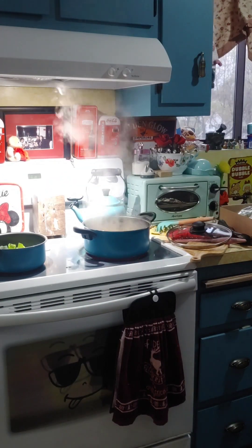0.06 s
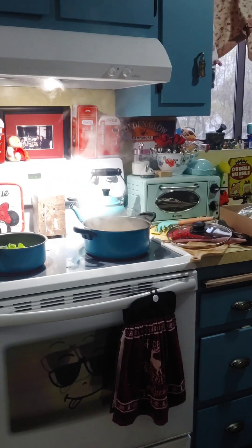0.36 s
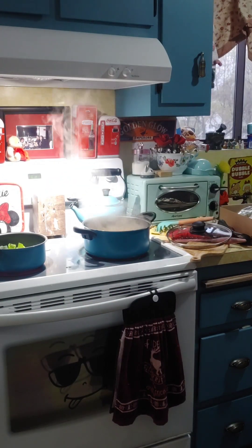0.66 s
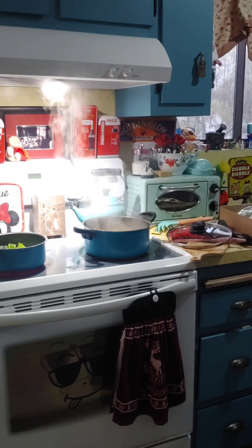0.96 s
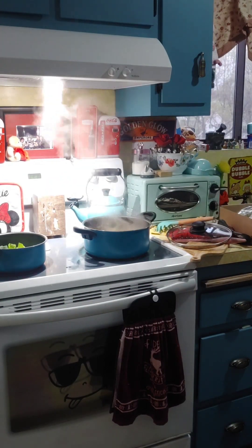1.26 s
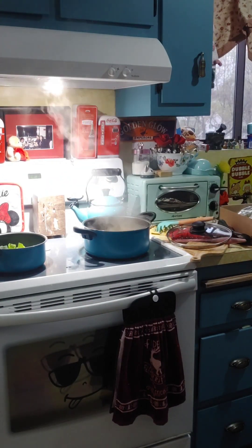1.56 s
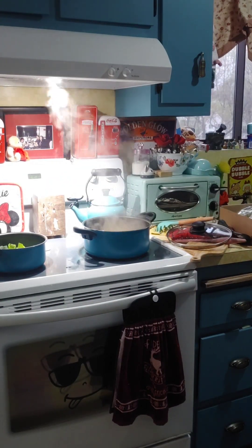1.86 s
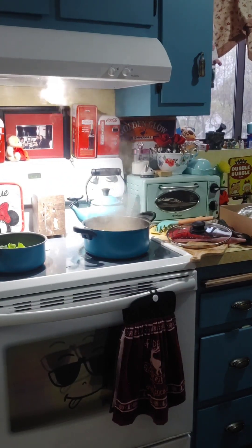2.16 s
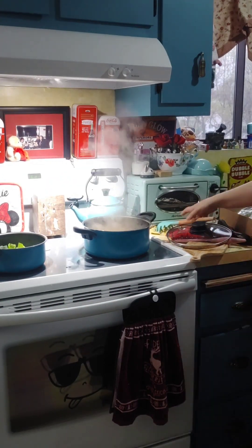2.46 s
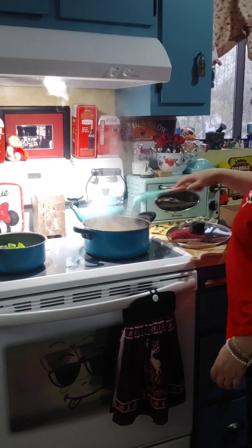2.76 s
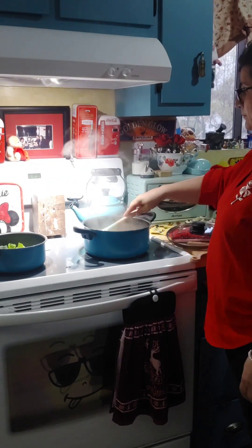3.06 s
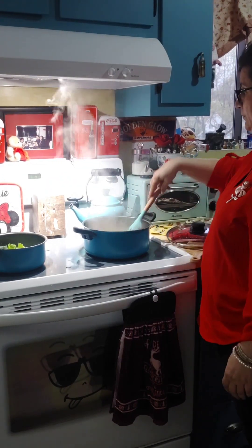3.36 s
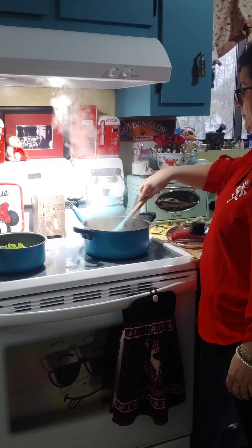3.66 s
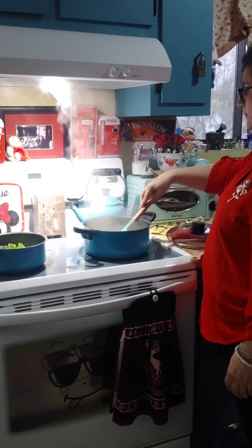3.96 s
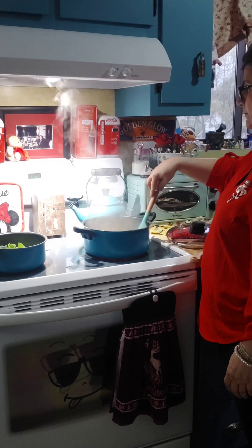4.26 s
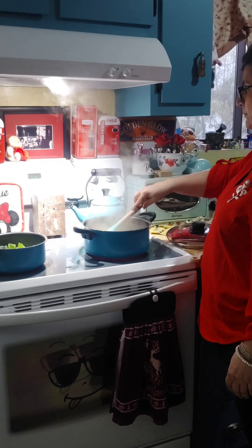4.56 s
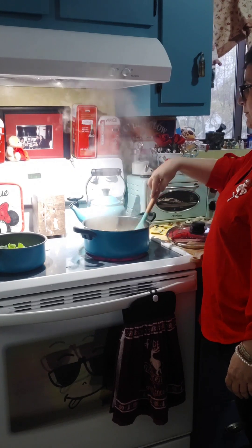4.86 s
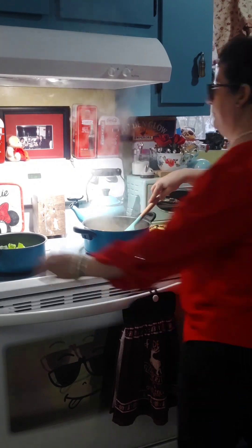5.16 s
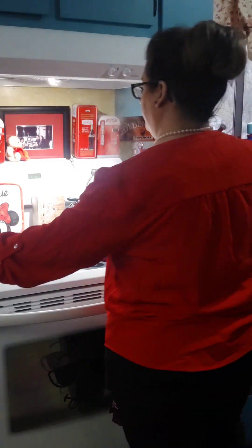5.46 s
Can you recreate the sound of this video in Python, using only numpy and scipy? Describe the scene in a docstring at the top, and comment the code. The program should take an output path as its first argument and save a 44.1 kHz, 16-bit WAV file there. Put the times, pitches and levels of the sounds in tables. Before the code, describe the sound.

A stove fan hums steadily over rushing air in a small home kitchen, with a pot simmering very faintly. Nearby, a drawer clacks, slides open and bumps its stop. After light rummaging and a nudge, it bangs shut, the loudest sound, and a pan rocks briefly to rest. Then come a soft sleeve rustle, a faint spoon clink on the pot and a few light utensil taps.

```python
"""A kitchen drawer clacks, slides open, is rummaged in and bangs shut; a pan rocks to rest after the bang.
Then a spoon taps a pot and a sleeve rustles past; utensils tap and scrape lightly here and there.
Each blow is scattered reflections, ringing modes and a panel thump; each rub is grainy friction hiss.
Behind it all a stove fan hums over rushing air, and bubbles burst in the simmering pot."""
import sys
import numpy as np
from scipy import signal
from scipy.fft import rfft, irfft
from scipy.io import wavfile
from scipy.ndimage import uniform_filter1d

SR = 44100
rng = np.random.default_rng(int(sys.argv[2]) if len(sys.argv) > 2 else 0)


def transcribe(u):
    """Save the signal u as a 16-bit wav file named by the first command-line argument.

    u: samples, shape (n,) or (channels, n), limited to [-1, 1]; the rate is SR.
    q: integer samples, one column per channel.
    """
    v = np.clip(np.atleast_2d(u).T, -1, 1)
    q = np.round(v * 32767).astype(np.int16)
    wavfile.write(sys.argv[1], SR, q)


N = 247842

# Left-right likeness of the kitchen's sound. Each row: frequency in Hz, coherence from 0 to 1.
COHERENCE = [(100, 0.97), (300, 0.72), (550, 0.57), (1000, 0), (2500, 0.09), (8000, 0)]
# Drawer struck by the slam or the pan. Each row: frequency in Hz, relative density in dB.
SLAM_SPECTRUM = [(25, -36), (55, -14), (82, -4.5), (125, -9), (200, -12), (300, 0), (520, -5),
                 (1000, -12.5), (1500, -19), (2800, -22.5), (3200, -27), (7100, -37.5), (8200, -51),
                 (15000, -66)]
# Its modes. Each row: frequency in Hz, relative level in dB, t60 in seconds before the cap in blows().
SLAM_RING = [(86, -9.5, 0.39), (198.5, 3.5, 0.16), (310, -2, .24), (471.5, -12, 0.23), (531, -13, 0.24),
             (679, -2.5, 0.15), (797, -10.5, 0.27), (940, -3.5, 0.12), (1164, -11, 0.23), (1345, -28, 0.25),
             (1734, -10, 0.17), (2020, -17, 0.06), (2645, -9, 0.088), (2814, -8.5, 0.053),
             (3736, -16, 0.064), (4300, -26, .11)]


def drawer():
    """The drawer clacks free, slides on its rails, bumps its stop, is rummaged in, nudged and slammed."""
    # Each row: start in seconds, level in dB, rise in seconds, treble in dB, thump in Hz, thump in dB.
    clacks = [(.205, -19.5, .014, -2.5, 222, -30.5)]
    bumps = [(.468, -33, 0.013, 12, 89, -47), (.480, -23, 0.0049, -3, 342, -28),
             (.507, -29, .0055, -18, 309, -27.5)]
    nudges = [(1.562, -38.5, .008, -10.5, 297, -40.5), (1.578, -50, 0.016, 8.5, 89, -44.5),
              (1.605, -34.5, 0.0061, 0, 296, -48)]
    slams = [(1.923, -23.5, 0.0051, 4, 82, -23), (1.931, -12, 0.0076, 3.5, 190.2, -18.5),
             (1.963, -18, 0.0021, -8, 285, -28), (2.045, -18, 0.0082, -1, 158.3, -23.5),
             (2.072, -23, .01, -22, 84, -41)]
    # Spectra of blows and rubs. Each row: frequency in Hz, relative density in dB.
    clack_spectrum = [(60, -35), (120, -13.5), (230, -3.5), (500, -3), (700, -6.5), (1100, -10), (1750, -6),
                      (2600, -6.5), (2900, -19), (3700, -7.5), (4800, -17), (7000, -18), (8200, -24.5),
                      (15000, -24)]
    bump_spectrum = [(40, -33), (140, -10.5), (190, -13), (300, -13), (380, -4.5), (450, -6.5), (530, 2),
                     (700, -10), (1300, -11.5), (2600, -16), (3300, -20.5), (5300, -26), (7500, -37.5),
                     (15000, -49)]
    nudge_spectrum = [(50, -23), (90, -17), (190, -8.5), (300, 1.5), (500, -9), (780, -7), (1150, -7.5),
                      (1400, -11.5), (2000, -11), (3200, -19), (5000, -21), (7000, -21.5), (8000, -34.5),
                      (15000, -43)]
    slide_spectrum = [(180, -21), (300, -5), (342, -13), (424, 2), (500, -14), (696, -8), (1140, -12.5),
                      (1750, -9.5), (3340, -13.5), (6790, -15), (15500, -34)]
    rummage_spectrum = [(400, -0.5), (1100, 1), (1500, -1), (2200, 3), (3000, -14), (6500, -16),
                        (9000, -29), (15000, -27)]
    # Modes. Each row: frequency in Hz, relative level in dB, uncapped t60 in seconds.
    clack_modes = [(422, 2, 0.086), (820, -10, 0.11), (1034, -2, 0.1), (1255, 1, 0.15), (1570, -4, 0.22),
                   (1752, 7, 0.1), (1920, -5, .14), (2300, -21, 0.069), (2580, 2, 0.13), (3690, -10, 0.14),
                   (4026, -13, 0.18), (4170, -21, 0.11), (4920, -25, 0.18), (6920, -14.5, 0.16)]
    bump_modes = [(310.5, -7.5, 0.16), (358, -9.5, .14), (536, -1, 0.11), (824, -11, 0.2),
                  (1400, -25, 0.23), (1910, -12.5, 0.54), (2340, -24, 0.18), (2380, -10.5, 0.097),
                  (2660, -5, 0.1), (4050, -10, 0.074), (5238, -12.5, 0.081)]
    nudge_modes = [(280, -4, 0.067), (623, 1.5, 0.12), (780, 1, 0.23), (1160, 1.5, 0.096),
                   (1480, -19, 0.21), (1970, -29, .14)]
    out = blows(clacks, clack_spectrum, clack_modes, hang=0.9, thump_t60_s=0.1, ring_db=-2.5, left_db=0.5)
    out += blows(bumps, bump_spectrum, bump_modes, hang=0.98, thump_t60_s=0.1, ring_db=-2, left_db=0.5)
    out += blows(nudges, nudge_spectrum, nudge_modes, hang=1.12, thump_t60_s=0.16, ring_db=-2, left_db=0)
    out += blows(slams, SLAM_SPECTRUM, SLAM_RING, hang=0.8, thump_t60_s=0.28, ring_db=-6.5, left_db=0.8)
    slide = stroke(start_s=0.3136, hold_s=0.063, db=-38, attack_s=0.015, fade_db_per_s=288)
    rummage = stroke(start_s=0.828, hold_s=0.22, db=-55, attack_s=0.028, fade_db_per_s=89)
    return out + rub(slide, slide_spectrum, grain_db=0.5) + rub(rummage, rummage_spectrum, grain_db=1)


def blows(rows, spectrum, modes, hang, thump_t60_s, ring_db, left_db, size=16384):
    """Each blow: reflections lasting hang times the room's t60, ringing modes and a panel thump."""
    # Kitchen decay. Each row: frequency in Hz, t60 in seconds.
    room_t60_s = [(80, 0.23), (250, 0.19), (700, 0.17), (1800, 0.18), (5000, 0.15), (10000, 0.15)]
    max_t60_s = 0.21  # things lying against each other damp the modes
    out, t = np.zeros((2, N)), np.arange(size) / SR
    for start_s, db, rise_s, treble_db, thump_hz, thump_db in rows:
        swell = 1 - np.exp(-(t / rise_s) ** 2.73)  # reflections pile up after first contact
        # a few strong reflections stand out
        crackle = amp(2.57 * unit_rms(uniform_filter1d(rng.standard_normal(size), size=40)))
        hz, age_s, bands = signal.stft(diffuse(size) * crackle, SR, nperseg=256)
        decay = amp(-60 * age_s / (hang * lookup(room_t60_s, hz)[:, None]))
        scatter = signal.istft(bands * decay, SR, nperseg=256)[1][:, :size]
        scatter = unit_onset(coloured(scatter * swell, lambda f: lookup(spectrum, f)))
        ring = 0
        for mode_hz, mode_db, t60_s in modes:
            spread_rad = np.arccos(lookup(COHERENCE, mode_hz)) * rng.choice([-1, 1])
            phase = 2 * np.pi * (mode_hz * t + rng.random()) + spread_rad * np.array([[0.5], [-0.5]])
            ring += amp(mode_db - 60 * t / min(t60_s, max_t60_s)) * np.sin(phase)
        hit = scatter + amp(ring_db) * unit_onset(ring * swell)
        # each blow has its own brightness, from dull knock to sharp tick
        hit = coloured(hit, lambda f: treble_db * f ** 2 / (f ** 2 + 2200 ** 2))
        thump = swell * amp(-60 * t / thump_t60_s) * np.sin(2 * np.pi * thump_hz * t)
        add(out, start_s, sides(left_db) * (amp(db) * hit + amp(thump_db) * unit_onset(thump[None])))
    return out


def rocking_pan():
    """The slam jolts a pan into ringing; each knock on the drawer floor renews the ring, more weakly."""
    # Knocks. Each row: start in seconds, level in dB, treble in dB, thump in Hz.
    rocks = [(2.127, -30.5, -7.5, 158), (2.185, -31.5, -11.5, 190), (2.279, -39, -14, 160.5),
             (2.324, -37.5, -15, 171.3)]
    # Pan modes. Each row: frequency in Hz, relative level in dB, rms pitch wander in Hz.
    modes = [(301, -2, 4.65), (429.5, -22, 13), (630, -28, 16), (910, -26, 60)]
    jolt_s, jolt_db, settle_db_per_s = 2.05, -22, 66
    rise_s, thump_db = 0.0075, -34.5
    envelope = 0
    for start_s in [jolt_s] + [row[0] for row in rocks]:
        contact_db = jolt_db - settle_db_per_s * (start_s - jolt_s)
        envelope += stroke(start_s, hold_s=0.048, db=contact_db, attack_s=0.023, fade_db_per_s=420)
    chatter = amp(2.2 * drift(60))
    ring = sum(amp(db) * tone(hz, wander_hz) for hz, db, wander_hz in modes)
    rows = [(start_s, db, rise_s, treble_db, hz, thump_db) for start_s, db, treble_db, hz in rocks]
    knocks = blows(rows, SLAM_SPECTRUM, SLAM_RING, hang=0.94, thump_t60_s=0.29, ring_db=-1.5, left_db=1.5)
    return envelope * sides(left_db=1) * chatter * ring + knocks


def utensil_taps():
    """Light contacts ring the utensils' high modes."""
    # Each row: start in seconds, level in dB, treble in dB.
    taps = [(.072, -62.5, 6), (.103, -41, -21), (.993, -63.5, 9), (1.218, -58.5, -15), (2.311, -59.5, 9.5),
            (2.936, -54, -22), (3.521, -44.5, -34), (5.163, -49, -22), (5.371, -57.5, 1),
            (5.461, -67, 11.5)]
    # Each row: frequency in Hz, relative density in dB.
    spectrum = [(300, -18.5), (600, -0.5), (1200, -4), (2100, 1.5), (3000, -8.5), (4300, -6), (5400, -10),
                (7000, -5), (8500, -16), (15000, -17.5)]
    # Each row: frequency in Hz, relative level in dB, t60 in seconds.
    modes = [(2420, 2, 0.13), (2810, 3, 0.11), (3720, -4.5, 0.19), (6000, -1.5, .12), (6250, -1, 0.15),
             (6850, 1, 0.119)]
    rise_s, thump_hz, thump_db = 0.0051, 582, -59.5
    rows = [(start_s, db, rise_s, treble_db, thump_hz, thump_db) for start_s, db, treble_db in taps]
    return blows(rows, spectrum, modes, hang=1.16, thump_t60_s=0.15, ring_db=-4.5, left_db=0.5)


def spoon_on_pot():
    """A spoon strikes the pot once: a short, bright clink."""
    # Each row: start in seconds, level in dB, rise in seconds, treble in dB, thump in Hz, thump in dB.
    clinks = [(3.156, -54, .013, 1, 510, -53.5)]
    # Each row: frequency in Hz, relative density in dB.
    spectrum = [(80, -34), (300, -12), (600, 1), (1200, -7.5), (2100, -4), (3000, -24), (4000, -5),
                (4400, 4), (6500, -3), (8300, -9), (11000, -15), (14000, -11), (16000, -18)]
    # Each row: frequency in Hz, relative level in dB, t60 in seconds.
    modes = [(2030, -3, 0.14), (2140, -0.5, 0.11), (3780, -2, 0.091), (4100, -6, 0.079), (4100, 4, 0.071),
             (4920, 3, 0.076), (5550, -5, 0.089)]
    return blows(clinks, spectrum, modes, hang=1.1, thump_t60_s=0.17, ring_db=1.5, left_db=0.1)


def utensil_scrapes():
    """Dragged utensils: a narrow hiss that sinks and fades as each one slows."""
    # Each row: start in seconds, length in seconds, starting pitch in Hz, starting level in dB.
    scrapes = [(0.891, 0.16, 2244, -52), (0.999, 0.095, 1216, -57), (5.13, .12, 2744, -63)]
    width_hz, sag_octaves_per_s, ramp_s, fade_db_per_s = 480, 1.8, 0.0033, 49
    lowpass = signal.butter(2, width_hz / 2, fs=SR, output="sos")
    out = np.zeros((2, N))
    for start_s, length_s, hz, db in scrapes:
        t = np.arange(0, length_s, 1 / SR)
        noise = rng.standard_normal((2, len(t))) + 1j * rng.standard_normal((2, len(t)))
        cycles = np.cumsum(hz * 2 ** (-sag_octaves_per_s * t)) / SR
        hiss = (signal.sosfilt(lowpass, noise) * np.exp(2j * np.pi * cycles)).real
        ramps = 1 - np.exp(-np.minimum(t, length_s - t) / ramp_s)
        add(out, start_s, ramps * amp(db - fade_db_per_s * t) * unit_rms(hiss))
    return out


def sleeve():
    """Cloth rustles with each sweep of the arm."""
    # Each row: start in seconds, hold in seconds, level in dB.
    sweeps = [(2.366, .045, -57.5), (2.448, 0.067, -55.5), (2.675, .28, -69.5), (5.013, 0.037, -61),
              (5.13, 0.044, -58.5), (5.26, 0.035, -59), (5.367, .15, -66)]
    # Each row: frequency in Hz, relative density in dB.
    cloth_spectrum = [(300, -9), (700, 7.5), (1500, -3), (2500, 2.5), (3500, -5.5), (7000, -8), (8500, -19),
                      (15000, -15.5)]
    envelope = sum(stroke(*row, attack_s=0.027, fade_db_per_s=142) for row in sweeps)
    return rub(envelope, cloth_spectrum, grain_db=2.5)


def rub(envelope, spectrum, grain_db):
    """Friction: hiss made uneven by small catches."""
    hiss = diffuse(N) * amp(grain_db * drift(81))
    return envelope * unit_rms(coloured(hiss, lambda f: lookup(spectrum, f)))


def fan():
    """Blade and motor tones over air rushing through a resonant duct."""
    # Each row: frequency in Hz, level in dB, left over right in dB, rms pitch wander in Hz.
    tones = [(118.1, -52, 3, 0.31), (236, -56.5, -2.5, 1.41), (371.8, -52, 8, 1.5), (593, -67.5, 8.5, 2.78)]
    # Each row: frequency in Hz, relative density in dB.
    air_spectrum = [(30, -28.5), (70, -14.5), (105, -5), (150, -7.5), (300, -3.5), (420, -6), (560, -6),
                    (720, -13.5), (1300, -21.5), (2400, -19), (3100, -26), (4000, -28), (7000, -32),
                    (8300, -38.5), (11800, -32), (15500, -36.5)]
    # Duct resonances. Each row: centre in Hz, width in Hz, lift in dB.
    duct = [(181.4, 34, 8.5), (297.1, 12, 15.8), (351, 13.7, 18.5), (838, 40, 4.4), (969, 121, 11.1),
            (1525, 60, 5.3), (1980, 330, 0.83), (2450, 69, 1.7)]

    def duct_db(f):
        return sum(db / (1 + (2 * (f - hz) / width_hz) ** 2) for hz, width_hz, db in duct)

    hum = sum(amp(db) * sides(left_db) * tone(hz, wander_hz) for hz, db, left_db, wander_hz in tones)
    air = coloured(diffuse(N), lambda f: lookup(air_spectrum, f) + duct_db(f))
    air_db = -51.5 + 0.42 * drift(12)
    return hum + amp(air_db) * sides(left_db=0.32) * unit_rms(air)


def simmer(db, low_hz, high_hz, t60_s, count):
    """Small bubbles burst in the pot, each a faint pip at its own pitch."""
    out, t = np.zeros((2, N)), np.arange(SR // 10) / SR
    attack = 1 - np.exp(-t / 0.0027)
    for when, pitch, size, left_phase, right_phase in rng.random((count, 5)):
        hz = low_hz * (high_hz / low_hz) ** pitch
        pip = np.sin(2 * np.pi * (hz * t + np.array([[left_phase], [right_phase]])))
        add(out, when * N / SR, pip * attack * amp(12 * size - 60 * t / t60_s))
    return amp(db) * unit_rms(out)


def stroke(start_s, hold_s, db, attack_s, fade_db_per_s):
    """Gain of one movement: builds from start_s, fades after hold_s."""
    age_s = np.maximum(np.arange(N) / SR - start_s, 0)
    return (1 - np.exp(-age_s / attack_s)) * amp(db - fade_db_per_s * np.maximum(age_s - hold_s, 0))


def diffuse(size):
    """White noise from all around: alike at both ears in the bass, unrelated in the treble."""
    mid, side = rfft(rng.standard_normal((2, size)))
    coherence = lookup(COHERENCE, np.fft.rfftfreq(size, 1 / SR))
    mid *= np.sqrt((1 + coherence) / 2)
    side *= np.sqrt((1 - coherence) / 2)
    return irfft([mid + side, mid - side], size)


def coloured(x, db_at, size=4096):
    """Minimum-phase filter with gain db_at(Hz)."""
    log_gain = np.log(amp(db_at(abs(np.fft.fftfreq(size, 1 / SR)))))
    taps = np.fft.ifft(np.exp(np.conj(signal.hilbert(log_gain)))).real[:size // 2]
    return signal.oaconvolve(x, taps[None], axes=1)[:, :x.shape[1]]


def tone(hz, wander_hz):
    """Sine of rms 1 with wandering pitch."""
    cycles = np.cumsum(hz + wander_hz * drift(9.54)) / SR
    return unit_rms(np.sin(2 * np.pi * (cycles + rng.random())))


def drift(rate_hz):
    """Random curve of rms 1, rolled off above rate_hz."""
    rolloff = np.exp(-(np.fft.rfftfreq(N, 1 / SR) / rate_hz) ** 2)
    return unit_rms(irfft(rfft(rng.standard_normal(N)) * rolloff, N))


def lookup(points, hz):
    """Interpolates a table on a log-frequency axis."""
    point_hz, value = np.transpose(points)
    return np.interp(np.log(hz + 1), np.log(point_hz + 1), value)


def amp(db):
    return 10 ** (np.asarray(db) / 20)


def unit_rms(x):
    return x / np.sqrt(np.mean(x ** 2) + 1e-20)


def unit_onset(x):
    """Scales to rms 1 over the first 25 ms."""
    return x / np.sqrt(np.mean(x[:, :SR // 40] ** 2))


def sides(left_db):
    """Stereo gains, left over right by left_db."""
    return amp(np.array([[left_db], [-left_db]]) / 2)


def add(mix, start_s, sound):
    part = mix[:, round(start_s * SR):][:, :sound.shape[1]]
    part += sound[:, :part.shape[1]]


def scene():
    """Drawer, pan, utensils and sleeve over the steady pot and fan."""
    stove = simmer(db=-70, low_hz=901, high_hz=2700, t60_s=0.15, count=420) + fan()
    return drawer() + rocking_pan() + utensil_taps() + spoon_on_pot() + utensil_scrapes() + sleeve() + stove


def record(dry):
    """The microphone sheds deep bass; gain control ducks after loud blows; a low-pass limits the band."""
    low_hz, high_hz = 38, 15850
    threshold_db, duck_db_per_db, release_db_per_s = -28, 0.13, 39
    dry = signal.sosfilt(signal.butter(2, low_hz, "highpass", fs=SR, output="sos"), dry)
    power_db = 10 * np.log10(abs(uniform_filter1d((dry ** 2).mean(0), size=600)) + 1e-12)
    fall_db = np.arange(N) * release_db_per_s / SR
    held_db = np.maximum.accumulate(power_db + fall_db) - fall_db  # peak detector with release
    over_db = np.maximum(held_db - threshold_db, 0)
    ducked = dry / amp(duck_db_per_db * uniform_filter1d(over_db, size=400))
    lowpass = signal.firwin(511, high_hz, window=("kaiser", 9), fs=SR)
    return signal.oaconvolve(ducked, lowpass[None], "same")


dry = scene()
out = record(dry)
transcribe(out)
```